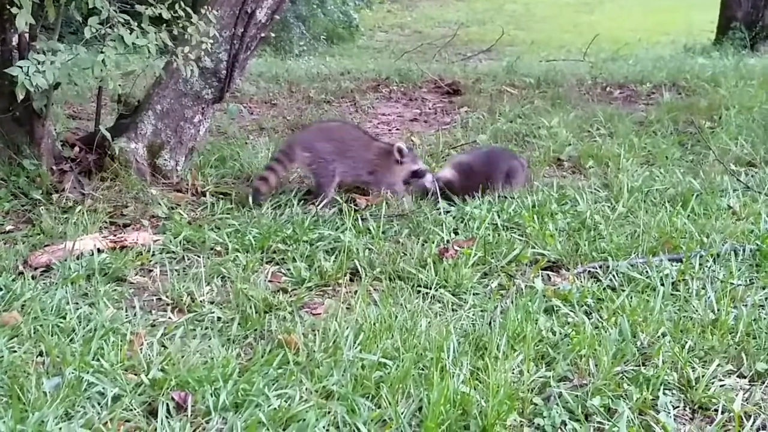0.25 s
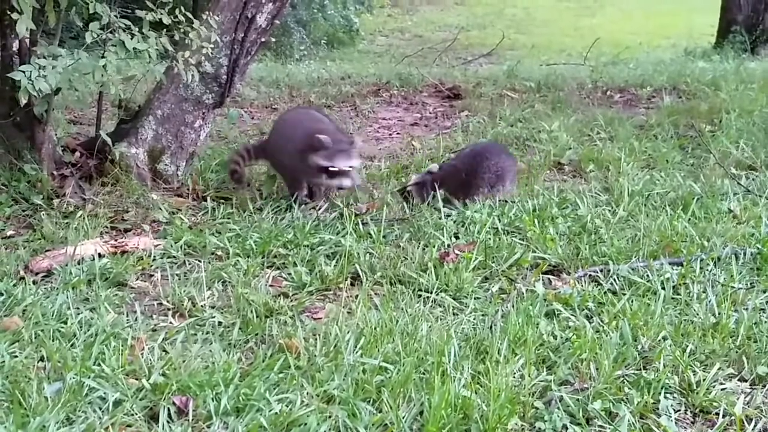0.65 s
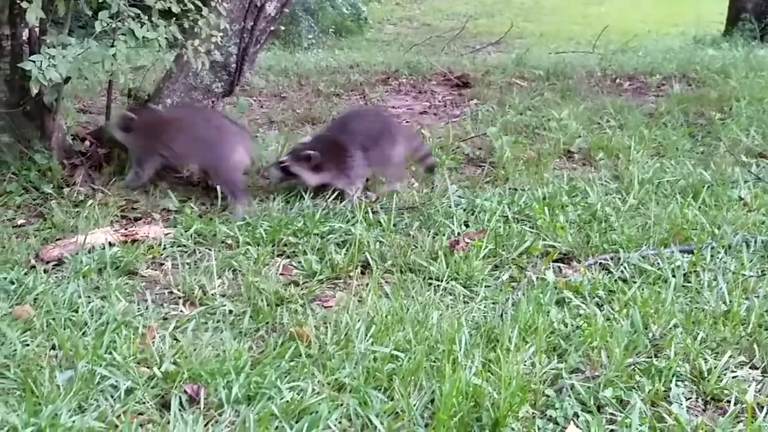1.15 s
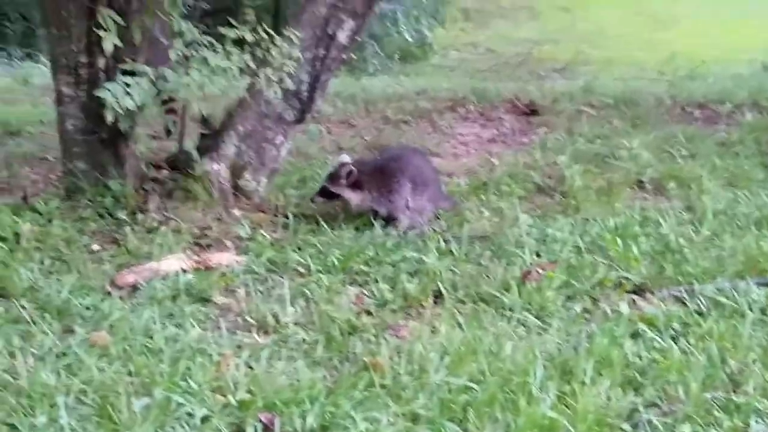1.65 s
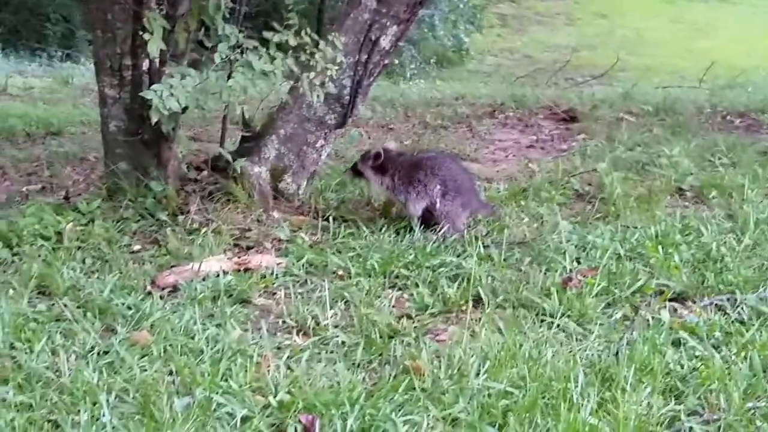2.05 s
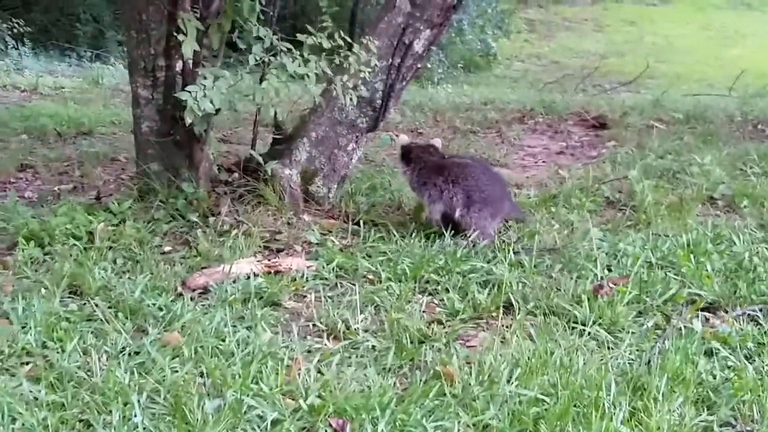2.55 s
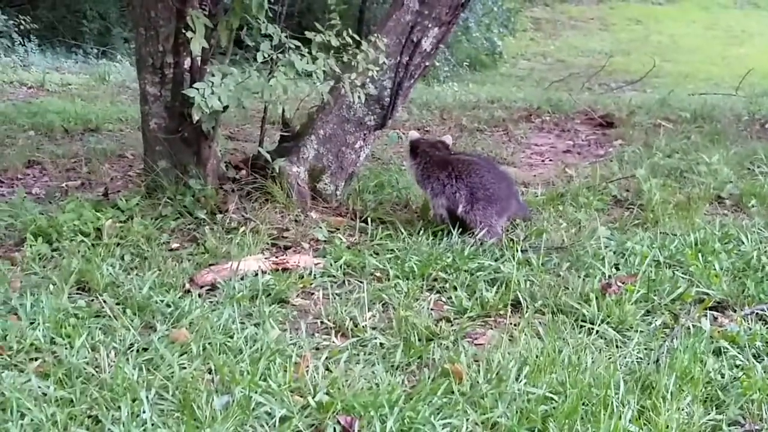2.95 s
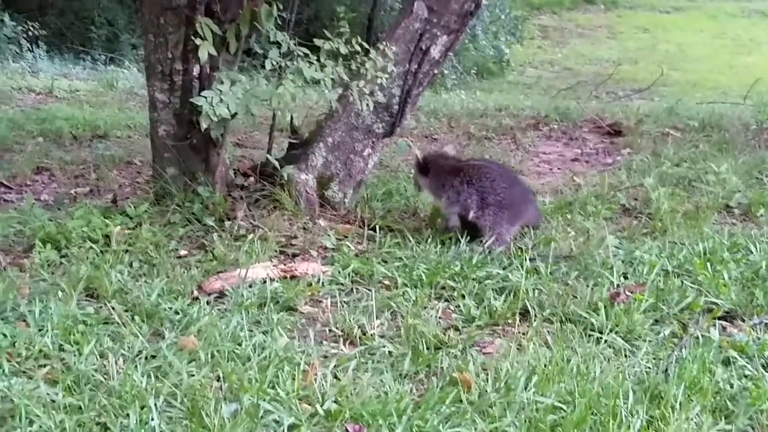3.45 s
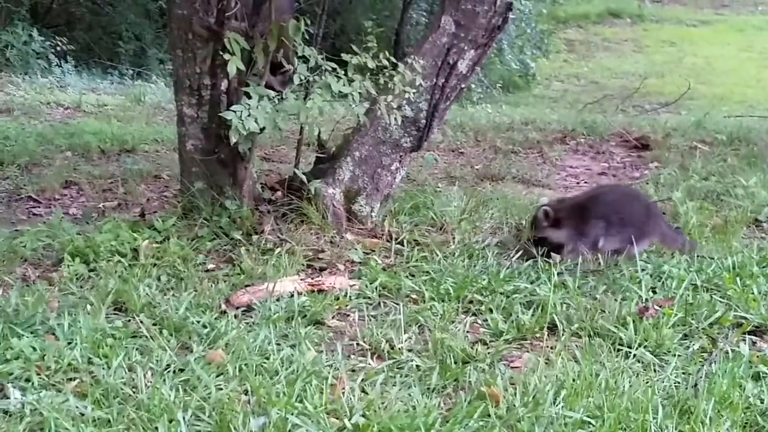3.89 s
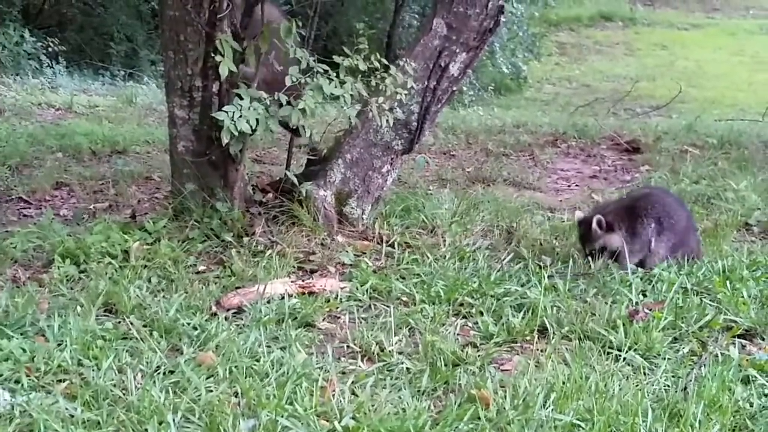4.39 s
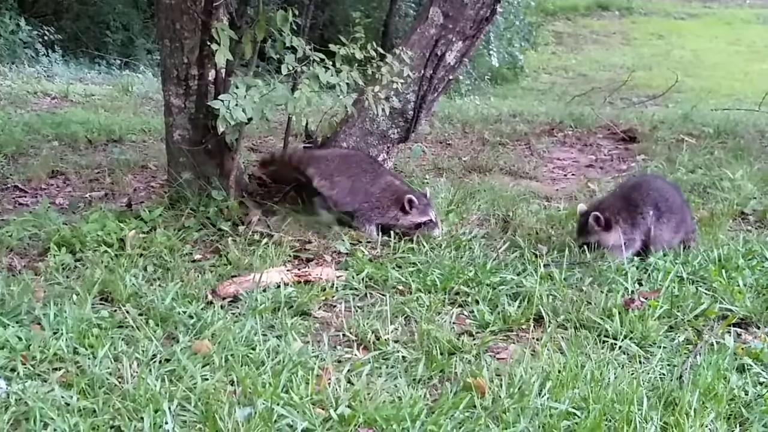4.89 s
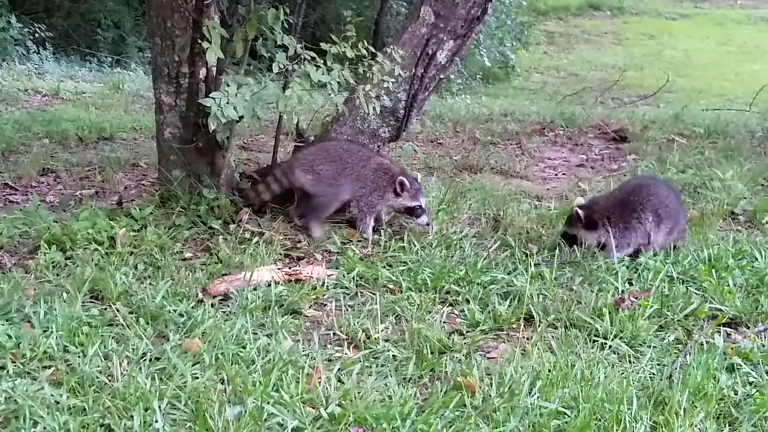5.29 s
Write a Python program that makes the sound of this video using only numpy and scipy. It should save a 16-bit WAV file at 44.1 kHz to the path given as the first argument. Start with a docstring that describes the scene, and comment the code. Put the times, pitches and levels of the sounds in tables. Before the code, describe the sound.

A steady, high-pitched insect chorus with short rising bird calls, while raccoons rustle through grass and snap a few dry stalks.

```python
"""Two young raccoons play on a lawn by a tree, over rasping insects, a far rumble and a machine's hum.
First birds whistle rising notes, paws set grass and dead leaves clicking, and wood rings to three knocks.
Dry stalks then fracture with sharp cracks, and two dull bumps jog the hand-held microphone.
After a lull one animal climbs, its claws sticking and slipping on the bark, while more stalks snap.
Near the end it slides down the trunk and lands with a thud that excites the damped modes of the turf."""
import sys
import numpy as np
from scipy import signal
from scipy.fft import rfft, irfft
from scipy.io import wavfile
from scipy.ndimage import map_coordinates

SR = 44100
rng = np.random.default_rng(int(sys.argv[2]) if len(sys.argv) > 2 else 0)


def log_audio(samples):
    """Write samples as a 16-bit WAV file to the path given in sys.argv[1]."""
    # one column per channel
    frames = np.atleast_2d(samples).T
    # limit to full scale, then quantise
    limited = np.clip(frames, -1, 1)
    pcm = np.round(limited * 32767).astype(np.int16)
    wavfile.write(sys.argv[1], SR, pcm)


N = 243873
TIME = np.arange(N) / SR

# Levels and spectral densities are relative: later gains and filters scale them.
# a paw or body pushing through the grass: peak_s, blades_db, leaves_db, settle_s
PAW_PUSHES = [(0.084, -50.5, -58, 0.087), (0.39, -59, -65, 0.2), (0.6, -58.5, -66.5, 0.079),
              (1.07, -60.5, -66.5, 0.098), (1.25, -54.5, -63, 0.065), (1.39, -57, -64, 0.18),
              (1.54, -55.5, -65.5, 0.021), (1.67, -57.5, -65, 0.12), (1.81, -57.5, -63.5, 0.061),
              (3.13, -62, -69.5, 0.041), (3.45, -61, -70, 0.14), (3.575, -59.5, -64, 0.075),
              (3.805, -54.5, -65, 0.081), (3.95, -59, -67.5, 0.089), (4.079, -53, -67, 0.064),
              (4.145, -56, -70, 0.047), (4.28, -59.5, -77, 0.091), (4.46, -56.5, -69, 0.08),
              (4.716, -50.5, -61.5, 0.062), (4.96, -57.5, -65.5, 0.17), (5.5, -62, -72.5, 0.068)]
# spectra of flicking grass and of crunching dead leaves: frequency_hz, density_db
BLADE_SPECTRUM = [(300, -26), (1500, -15), (3500, -11), (4900, -4), (5450, -18), (7500, -3.5), (9000, 12.5),
                  (10500, 3.5), (12500, 10), (14400, 0.5)]
LEAF_SPECTRUM = [(100, -18), (300, 3), (1300, -1), (2400, -1.5), (4000, -1.5), (5400, -15), (8000, -34)]
# claws catching on bark: peak_s, half_width_s, level_db
CLAW_SCRATCHES = [(3.6, 0.016, -62), (4.245, .02, -58), (4.507, 0.0087, -54.5)]
# dry stalks breaking: start_s, level_db, tear_decay_s, left_minus_right_db
STALK_SNAPS = [(1.162, -41, 0.0024, -2), (1.345, -42, 0.004, -1), (1.393, -45, .005, 2),
               (1.784, -45, 0.0034, 4), (1.828, -43, 0.0054, 4), (4.099, -40, .004, -1),
               (4.236, -33, 0.0059, 3), (4.2614, -51, .002, 0), (4.361, -30, .0024, 2),
               (4.4174, -27, 0.0021, 2), (4.507, -39.5, .003, -2), (4.714, -38, .002, -2)]
# knocks on wood, paws sliding down the trunk, the body landing: start_s, level_db, scrape_decay_s
WOOD_KNOCKS = [(0.3183, -40, .001), (0.3383, -38.5, .001), (0.3592, -37.5, 0.0012)]
TRUNK_SLIDES = [(4.590, -46.5, 0.012), (4.679, -48, 0.033)]
LANDING_THUDS = [(4.7135, -39, 0.0069)]
# normal modes of each vibrating body: frequency_hz, gain_db, t60_s
BARK_MODES = [(3800, 7, .004), (4270, -1, 0.0032), (5000, -4, .004)]
STALK_MODES = [(8900, 9, .002), (10700, 6, .0018), (12200, 12.5, 0.0015), (14300, 9, .0016)]
WOOD_MODES = [(970, -9, 0.0057), (1670, 0, 0.0024), (2420, 0, 0.014), (2650, -11, 0.014)]
TRUNK_MODES = [(149, -11, 0.036), (536, -7, 0.027), (682, -3, .028), (840, -14, .02)]
TURF_MODES = [(140, -2, 0.06), (250, 0, 0.04), (427, -7, 0.02), (580, -8, 0.024), (1600, -12, .03)]
# wing resonances of the two insect choirs: frequency_hz, density_db
LOW_WING_SPECTRUM = [(5550, -62), (5780, -18.5), (6020, -23), (6260, -8), (6500, -1.5), (6730, 2),
                     (7010, 3), (7250, -6), (7550, -14), (7950, -36), (8600, -98)]
HIGH_WING_SPECTRUM = [(7500, -51), (8150, -7.5), (8500, -2), (8800, 6.5), (9200, 4), (9600, -6),
                      (10400, -16.5), (11300, -21), (12000, -7.5), (13200, -6.5), (14400, -15)]
# raspy rising calls of a bird on the right: start_s, length_s, top_hz, level_db
BIRD_BUZZES = [(0.067, 0.21, 4495, -51), (1.74, 0.2, 4245, -53.5), (3.077, .16, 4380, -49),
               (4.624, .23, 4330, -51)]
# a second bird's whistles, slurred up and then down: start_s, length_s, level_db
BIRD_WHISTLES = [(0.078, .195, -56), (3.405, .205, -58)]
# short hoarse chirps, one leading into the second whistle: start_s, length_s, pitch_hz, level_db
BIRD_CHIRPS = [(0.581, 0.046, 2263, -58), (0.638, 0.072, 2920, -65), (0.784, 0.099, 2294, -62),
               (1.2, .05, 2310, -65), (1.29, 0.068, 2280, -60.5), (3.37, 0.045, 2094, -59),
               (3.605, 0.023, 2450, -55)]
# soft outdoor background hiss, cut off steeply above about 4.3 kHz: frequency_hz, density_db
HISS_SPECTRUM = [(12, -9), (28, -26), (48, -8), (85, 3), (115, -3), (165, -11.5), (260, -11), (380, -18.5),
                 (900, -20), (1500, -23.5), (2300, -21.5), (3000, -25.5), (4250, -23.5), (4800, -76),
                 (5400, -73)]
# likeness of the hiss in the two channels: frequency_hz, correlation
HISS_CORRELATION = [(25, 0.47), (70, 0.9), (160, 0.82), (320, 0.49), (700, -0.012), (1400, -0.098),
                    (4000, 0.11)]
# partials of the distant machine: frequency_hz, level_db
HUM_PARTIALS = [(57, -57.5), (91.8, -58.5)]
# spectrum of the far rumble: frequency_hz, density_db
RUMBLE_SPECTRUM = [(60, -28.0), (130, 2.0), (190, -0.5), (300, -14.0), (700, -20.0), (3000, -47)]
# slow envelopes of the hiss, the hum and the rumble: time_s, level_db
HISS_ENVELOPE = [(0, 0.5), (1.4, -0.2), (2.5, -1), (5.5, -1.36)]
HUM_ENVELOPE = [(0, -3.5), (.8, -3.5), (1.9, 2.5), (3, 3.5), (4.3, 0), (5.5, 5.5)]
RUMBLE_ENVELOPE = [(0, -56), (.6, -56), (1.2, -60.5), (2, -61), (3.2, -63), (4.2, -63.5), (4.8, -58.5),
                   (5.5, -58)]
# bumps on the hand-held microphone: peak_s, half_width_s, level_db
HANDLING_BUMPS = [(1.896, 0.031, -41.5), (3.474, 0.041, -50.5)]
# spectrum of those bumps: frequency_hz, density_db
BUMP_SPECTRUM = [(10, -16), (27, 0), (42, -6), (110, -30), (400, -80)]


def paws():
    """Each push excites two click populations: swishing blades and the dead leaves under them."""
    peak_s, blades_db, leaves_db, settle_s = np.transpose(PAW_PUSHES)
    blades = rustle(zip(peak_s, blades_db, settle_s), BLADE_SPECTRUM, grains_per_s=5000,
                    size_spread_db=-0.5, gain_db=4.0, stir_db=-70, clump_db=0.6)
    leaves = rustle(zip(peak_s, leaves_db, settle_s), LEAF_SPECTRUM, grains_per_s=2000,
                    size_spread_db=1.2, gain_db=3.5, stir_db=-75, clump_db=2.0)
    return blades + leaves


def rustle(pushes, spectrum, grains_per_s, size_spread_db, gain_db, stir_db, clump_db):
    """Shot noise: foliage flicks past fur in random clicks, denser and louder as the motion grows."""
    power = 0
    for peak_s, level_db, settle_s in pushes:
        age = (TIME - peak_s) / settle_s
        push = np.exp(-np.where(age < 0, (age / 0.67) ** 2, age))   # bends faster than it settles
        power = power + (from_db(level_db) * push) ** 2
    motion = np.sqrt(from_db(stir_db) ** 2 + power * from_db(clump_db * drift(110)) ** 2)
    flicks = rng.random(N) < grains_per_s * np.sqrt(rms_one(motion)) / SR
    sizes = from_db(size_spread_db * np.minimum(rng.exponential(1, N), 4))
    grains = coloured(flicks * sizes * rng.standard_normal((2, N)), spectrum)
    return from_db(gain_db) * motion * grains


def claws(slips_per_s):
    """Stick-slip friction: a claw skids in a run of tiny slips, each exciting the bark's modes."""
    slips = (rng.random(N) < slips_per_s / SR) * rng.standard_normal((2, N))
    return pulses(CLAW_SCRATCHES) * rms_one(modal_response(slips, BARK_MODES))


def snapping_stalks(highpass_hz, body_db, scatter_db):
    """Brittle fracture: an impulse rings the stalk, then its fibres tear over a faint woody resonance."""
    tear_envelope, impulses = np.zeros((2, 2, N))
    for start_s, level_db, decay_s, balance_db in STALK_SNAPS:
        age = np.maximum(TIME - start_s, 0)
        size = from_db(level_db) * panned(balance_db)
        tear_envelope += (age > 0) * np.exp(-age / decay_s) * size
        impulses[:, int(start_s * SR)] += .0014 / decay_s * size[:, 0]   # quicker breaks crack harder
    tearing = tear_envelope * np.sign(rng.standard_normal((2, N))) + 1e-18
    ringing = sum((-1) ** k * from_db(db) * ring(impulses, hz, t60)
                  for k, (hz, db, t60) in enumerate(STALK_MODES))
    highpass = signal.butter(5, highpass_hz, "high", fs=SR, output="sos")
    cracks = signal.sosfilt(highpass, tearing + ringing)
    cracks += from_db(body_db) * ring(tearing, hz=3920, t60=0.0012)
    return cracks + from_db(scatter_db) * scattering(cracks, t60=.12)


def impacts(blows, modes, scrape_db, lowpass_hz, scatter_db):
    """Impact excitation: a blow and its scrape, low-passed by soft contact, drive a body's modes."""
    force = np.zeros(N)
    for start_s, level_db, scrape_s in blows:
        age = np.maximum(TIME - start_s, 0)
        scrape = (age > 0) * np.exp(-age / scrape_s) * rng.standard_normal(N)
        force += from_db(level_db + scrape_db) * scrape
        force[int(start_s * SR)] += from_db(level_db)
    force = signal.sosfilt(signal.butter(3, lowpass_hz, fs=SR, output="sos"), force + 1e-18)
    ringing = modal_response(force, modes)
    return ringing + from_db(scatter_db) * scattering(ringing, t60=.12)


def insects():
    """Stridulation: a loud choir on the right eases off slightly; a thinner, higher one fills both sides."""
    low = choir(LOW_WING_SPECTRUM, strokes_per_s=42.2, nearest_db=3.5, swell_db=.35, swells_per_s=8)
    high = choir(HIGH_WING_SPECTRUM, strokes_per_s=33, nearest_db=4, swell_db=.9, swells_per_s=9)
    low_db = np.interp(TIME, [0, 2.8, 5.5], [-46, -46, -47.3])
    return from_db(low_db) * low * panned(-8.5) + from_db(-54.5) * high * panned(-0.5)


def choir(wing_spectrum, strokes_per_s, nearest_db, swell_db, swells_per_s, count=28):
    """Incoherent sources add in power: each insect rasps once per wing stroke, the nearest loudest."""
    paces = strokes_per_s * np.geomspace(.8, 4.5, count) * rng.uniform(1.0, 1.05, count)
    power = from_db(nearest_db) ** 2 * np.sin(np.pi * strokes_per_s * TIME + 0.1 * drift(1.73)) ** 4
    for pace in paces:
        power = power + np.sin(np.pi * pace * TIME + 2 * drift(3.3)) ** 4
    rasp = np.sqrt(power) * rng.standard_normal((2, N))
    return coloured(rasp, wing_spectrum) * from_db(swell_db * drift(swells_per_s))


def birds(rasp_hz, flutter_hz, scattered_db):
    """Frequency modulation: a fast flutter of pitch gives each gliding whistle raspy sidebands."""
    flutter = np.sin(2 * np.pi * flutter_hz * TIME + 2 * drift(60))
    flutter = flutter + 0.65 * drift(300) + 0.367 * drift(50)

    def note(u, hz, level_db, rasp):
        """Phase is the integral of frequency; the tone swells and fades as u runs from 0 to 1."""
        swell = 2 * np.sqrt(u * (1 - u))
        phase = 2 * np.pi * np.cumsum(hz + rasp * rasp_hz * flutter) / SR
        return from_db(level_db) * swell * np.sin(phase)

    def perched(song, direct_db, balance_db):
        """Multipath propagation: leaves weaken the direct sound, and the trees add a scattered tail."""
        song = song * panned(balance_db)
        return from_db(direct_db) * song + from_db(scattered_db) * scattering(song, t60=.7)

    buzzes, whistles, chirps = np.zeros((3, N))
    for start_s, length_s, top_hz, level_db in BIRD_BUZZES:   # each climbs, fades and grows less hoarse
        u = progress(start_s, length_s)
        buzzes += note(u, top_hz - 620 * (1 - u), level_db - 10 * u, rasp=.85 * (1 - u + 0.51 * u))
    for start_s, length_s, level_db in BIRD_WHISTLES:
        u = progress(start_s, length_s)
        hz = np.interp(u, [0, .8, 1], [1970, 2695, 2060])
        whistles += note(u, hz, level_db + 2.5 * drift(84), rasp=.1)
    for start_s, length_s, hz, level_db in BIRD_CHIRPS:
        chirps += note(progress(start_s, length_s), hz, level_db, rasp=0.87)
    u = progress(start_s=1.13, length_s=0.28)
    sagging_note = note(u, hz=3030 + 190.3 * (1 - u) ** 2, level_db=-61, rasp=.22)
    return (perched(buzzes, direct_db=-4, balance_db=-8.5)
            + perched(whistles, direct_db=-2, balance_db=-1.5)
            + perched(chirps, direct_db=0.0, balance_db=1.5)
            + perched(sagging_note, direct_db=-8, balance_db=-6))


def outdoor_hiss(level_db):
    """Partial coherence: the soft hiss is alike on both sides in the bass, unrelated in the treble."""
    correlation = np.clip(per_bin(HISS_CORRELATION), -1, 1)
    mid, side = rfft(rng.standard_normal((2, N)))
    left_right = np.sqrt(1 + correlation) * mid + np.sqrt(1 - correlation) * side * [[1], [-1]]
    hiss = coloured(irfft(left_right, N), HISS_SPECTRUM)
    return from_db(level_db + in_time(HISS_ENVELOPE)) * hiss


def machine_hum():
    """Superposition: a distant machine's two low partials wander in phase and slowly swell together."""
    hum = sum(from_db(db) * rms_one(np.sin(2 * np.pi * hz * TIME + .5 * drift(4.24)))
              for hz, db in HUM_PARTIALS)
    return from_db(in_time(HUM_ENVELOPE)) * hum


def far_rumble():
    """Correlated noise: a dull swell from beyond the trees reaches both sides nearly alike."""
    noise = rng.standard_normal(N) + 0.63 * rng.standard_normal((2, N))
    return from_db(in_time(RUMBLE_ENVELOPE)) * coloured(noise, RUMBLE_SPECTRUM)


def handling():
    """Structure-borne sound: turning the microphone makes deep soft bumps, different in each channel."""
    deep_noise = coloured(rng.standard_normal((2, N)), BUMP_SPECTRUM)
    return (pulses(HANDLING_BUMPS) + from_db(-66)) * deep_noise * panned(balance_db=6)


def scattering(x, t60):
    """Diffuse reverberation: trunks, leaves and grass return a dying tail, different on each side."""
    tails = rng.standard_normal((2, SR)) * from_db(-60 * TIME[:SR] / t60)
    tails /= np.sqrt(np.sum(tails ** 2, axis=1, keepdims=True))
    return signal.fftconvolve(np.atleast_2d(x), tails, axes=1)[:, :N]


def modal_response(force, modes):
    """Modal superposition: a body's vibration is the sum of its modes."""
    return sum(from_db(db) * ring(force, hz, t60) for hz, db, t60 in modes)


def ring(force, hz, t60):
    """Damped oscillator: a unit impulse starts a unit sine that falls 60 dB in t60 seconds."""
    decay, step = from_db(-60 / (t60 * SR)), 2 * np.pi * hz / SR
    return signal.lfilter([0, np.sin(step)], [1, -2 * decay * np.cos(step), decay * decay], force + 1e-18)


def coloured(x, spectrum):
    """Spectral shaping, scaled to unit power."""
    return rms_one(irfft(rfft(x) * from_db(per_bin(spectrum)), N))


def drift(rate):
    """Smooth random modulation of spread near 1, changing about `rate` times a second."""
    knots = rng.standard_normal(N // 20)
    return map_coordinates(knots, [TIME[::20] * rate + 2], order=3, mode="wrap").repeat(20)[:N]


def pulses(events):
    """A sum of Gaussian envelopes, one per event."""
    return sum(from_db(db) * np.exp(-((TIME - peak_s) / width_s) ** 2) for peak_s, width_s, db in events)


def progress(start_s, length_s):
    """Normalised time, from 0 to 1 during a note."""
    return np.clip((TIME - start_s) / length_s, 0, 1)


def in_time(curve):
    """Linear interpolation of a table at every sample."""
    return np.interp(TIME, *np.transpose(curve))


def per_bin(points):
    """Interpolation of a table over log frequency at every FFT bin."""
    hz, value = np.transpose(points)
    return np.interp(np.log(np.arange(N // 2 + 1) * SR / N + 1), np.log(hz), value)


def panned(balance_db):
    """Level difference sets direction: left and right gains, positive to the left."""
    return from_db(np.array([[.5], [-.5]]) * balance_db)


def rms_one(x):
    """Normalisation to unit power."""
    return x / np.sqrt(np.mean(x ** 2) + 1e-20)


def from_db(db):
    """Decibels to amplitude ratio."""
    return 10 ** (np.asarray(db) / 20)


def scene():
    """Linear superposition: the pressures of raccoons, chorus and background add."""
    chorus = insects() + birds(rasp_hz=203.2, flutter_hz=106.35, scattered_db=2.0)
    stalks = snapping_stalks(highpass_hz=8900, body_db=-32, scatter_db=-11)
    knocks = impacts(WOOD_KNOCKS, WOOD_MODES, scrape_db=-27, lowpass_hz=3040, scatter_db=-8)
    descent = impacts(TRUNK_SLIDES, TRUNK_MODES, scrape_db=-22, lowpass_hz=1500, scatter_db=-5)
    landing = impacts(LANDING_THUDS, TURF_MODES, scrape_db=-30, lowpass_hz=1900, scatter_db=-10)
    raccoons = paws() + claws(slips_per_s=1900) + stalks + knocks + descent + landing
    background = (outdoor_hiss(level_db=-49.5) + machine_hum()) * panned(balance_db=0.5)
    return raccoons + chorus + background + far_rumble() + handling()


def record(dry):
    """Band limiting: a steep elliptic low-pass removes the treble above 14.8 kHz."""
    return signal.sosfilt(signal.ellip(12, .2, 80, 14800, fs=SR, output="sos"), dry)


dry = scene()
out = record(dry)
log_audio(out)
```